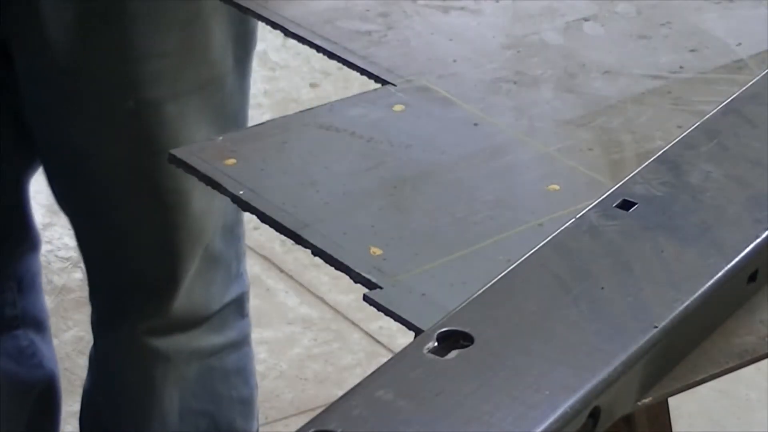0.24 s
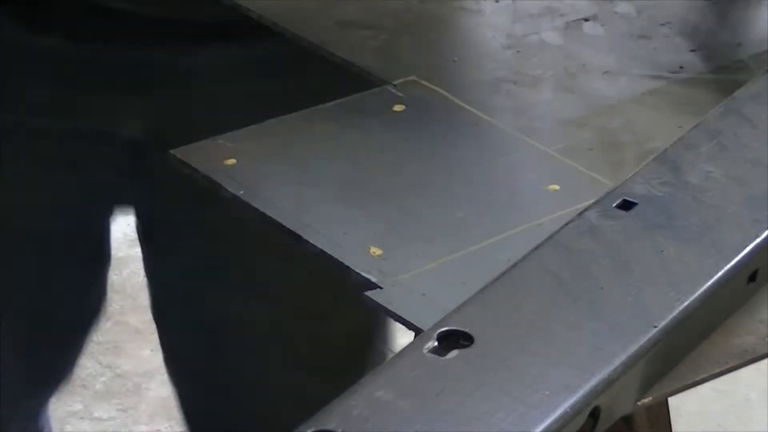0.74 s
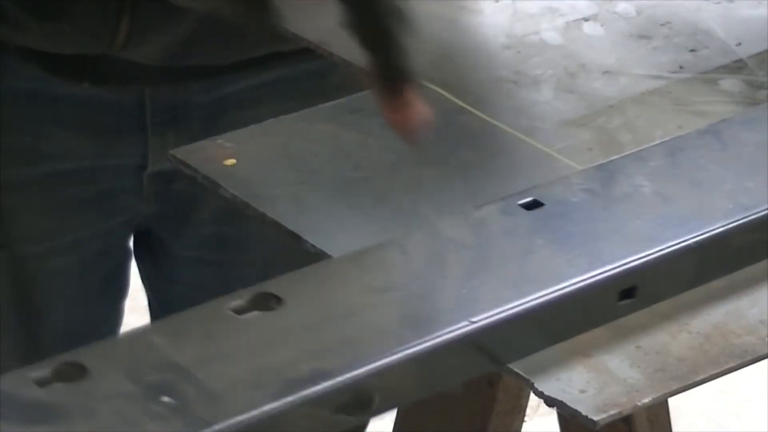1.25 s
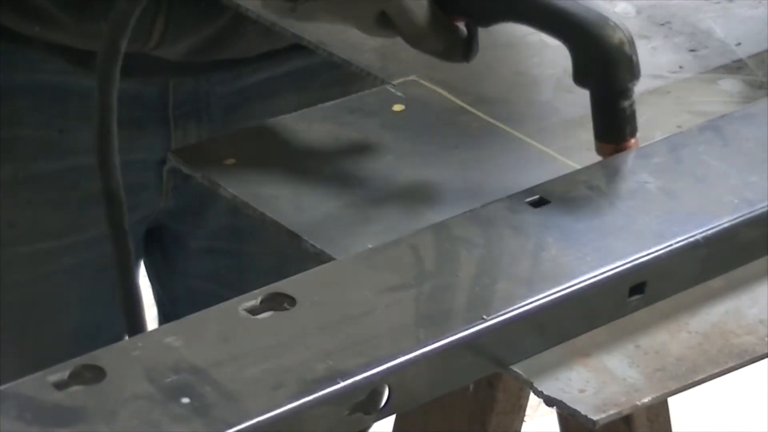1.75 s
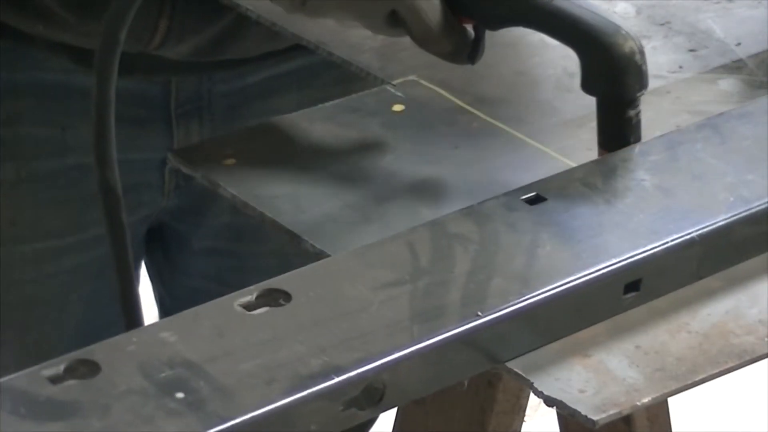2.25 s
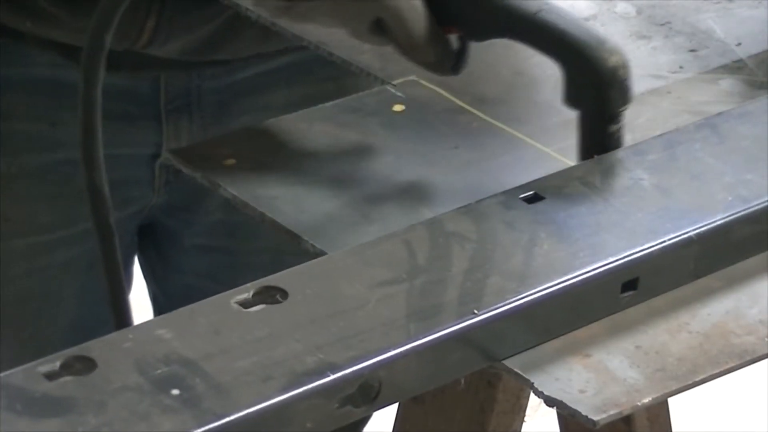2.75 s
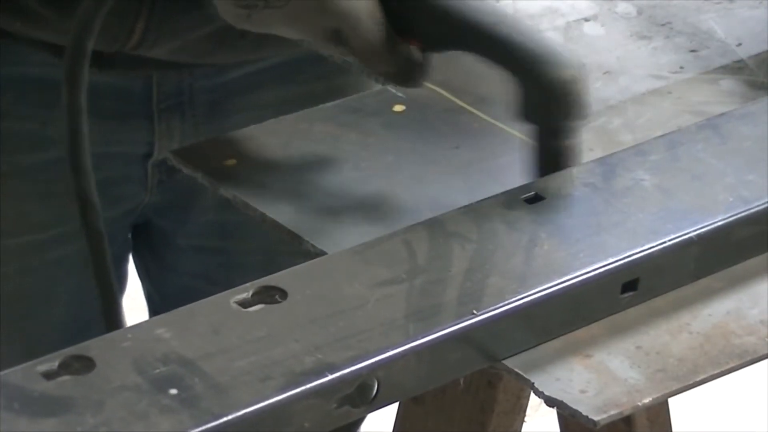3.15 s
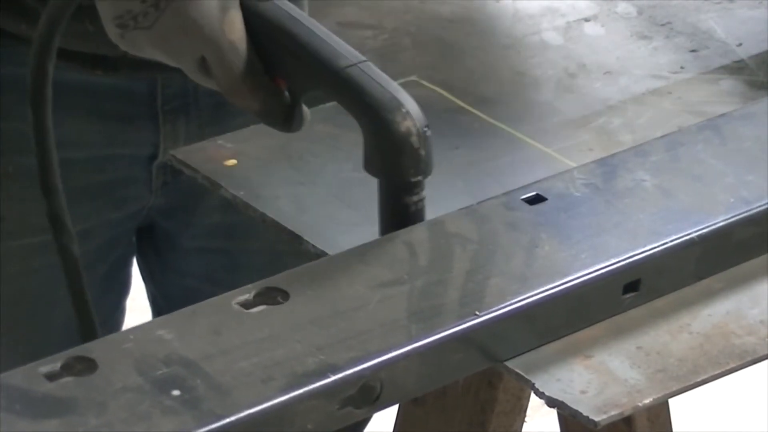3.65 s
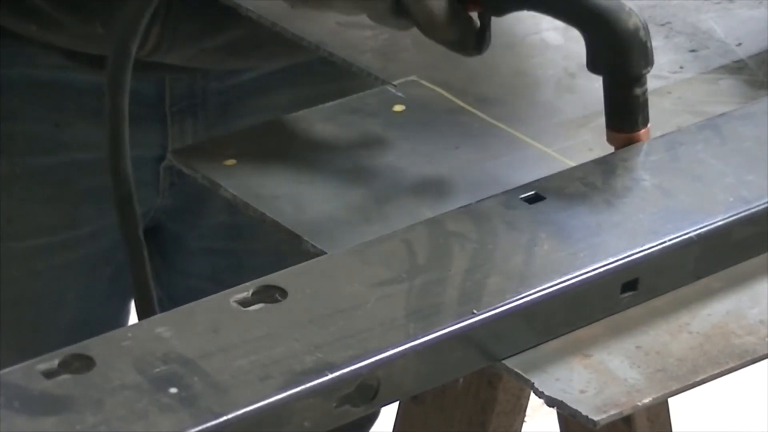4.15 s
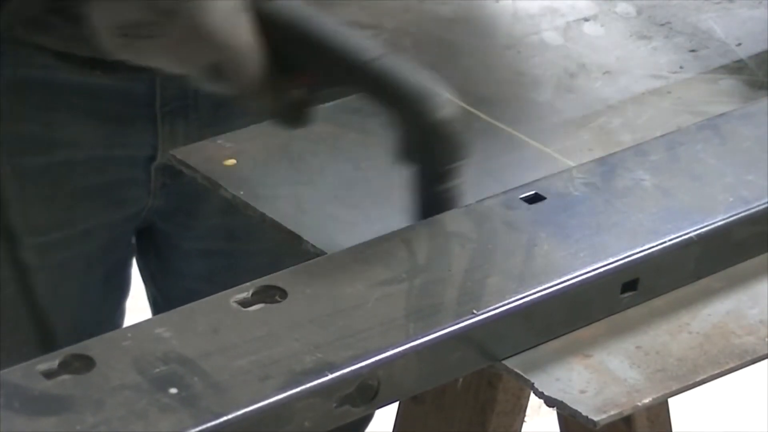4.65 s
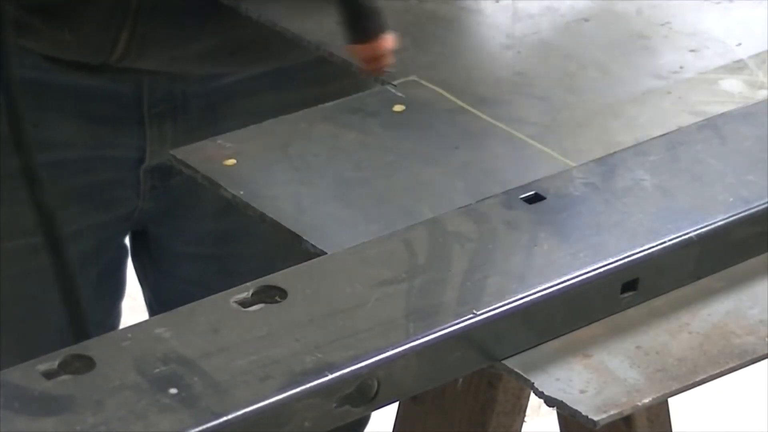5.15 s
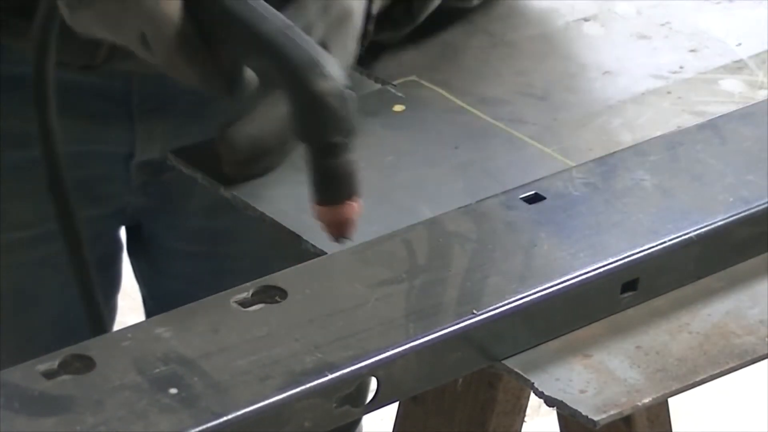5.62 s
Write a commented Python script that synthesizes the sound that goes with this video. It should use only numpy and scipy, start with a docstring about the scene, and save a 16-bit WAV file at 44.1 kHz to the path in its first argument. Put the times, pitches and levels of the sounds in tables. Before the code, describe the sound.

Air hisses loudly from a plasma torch as a steel beam is dragged, then cuts off with a thump before light scraping.

```python
"""Cooling air hisses from a plasma torch over a steel plate in a workshop. A steel channel is dragged into
place, stick-slip driving its modes, and the camera's gain control ducks the clank. As the tip comes down,
the hiss interferes with its reflection from the plate and notches sweep through it. The tip taps the steel
and the jet roars against it. The air valve shuts with a thump, the tip knocks and scrapes along the guide,
and the shop falls quiet but for light taps, low shuffling and the channel's faint ring."""
import sys
import numpy as np
from scipy import signal
from scipy.fft import rfft, irfft, next_fast_len
from scipy.io import wavfile
from scipy.ndimage import uniform_filter1d, minimum_filter1d, map_coordinates

SR = 44100
rng = np.random.default_rng(int(sys.argv[2]) if len(sys.argv) > 2 else 0)


def wav_record(signal):
    """Record a signal, one row per channel, as 16-bit PCM in the file named by sys.argv[1]."""
    frames = np.transpose(np.atleast_2d(signal))
    bounded = np.clip(frames, -1, 1)
    # unit amplitude maps onto the largest positive 16-bit level
    quanta = np.round(bounded * 32767).astype(np.int16)
    wavfile.write(sys.argv[1], SR, quanta)


N = 259308
TIME = np.arange(N) / SR


def amp(db):
    """Amplitude ratio of a level in decibels."""
    return 10 ** (np.asarray(db) / 20)

def unit(x):
    """Normalisation to rms 1."""
    return x / np.sqrt(np.mean(x ** 2) + 1e-20)

def along(points, hz):
    """Interpolation of (frequency, value) points on a logarithmic frequency axis."""
    f, v = np.transpose(points)
    return np.interp(np.log(hz + 1), np.log(f + 1), v)

def curves(rows, t=TIME):
    """Linear interpolation in time of each column after the first."""
    times, *columns = np.transpose(rows)
    return [np.interp(t, times, column) for column in columns]

def during(start_s, end_s):
    """A rectangular window with ramped edges."""
    return uniform_filter1d(1. * ((TIME > start_s) & (TIME < end_s)), size=400)

def filtered(x, response):
    """Linear filtering: the spectrum is multiplied by a frequency response."""
    size = next_fast_len(N + SR)
    return irfft(rfft(x, size) * response(np.fft.rfftfreq(size, 1 / SR)), size)[..., :N]

def noise(spectrum):
    """Spectral shaping of white noise, at rms 1."""
    return unit(filtered(rng.standard_normal(N), lambda hz: amp(along(spectrum, hz))))

def modes(table):
    """Modal superposition: the response of damped resonators of alternating sign."""
    return lambda f: sum((-1) ** k * amp(db) * 1j * f * width / (hz * hz - f * f + 1j * f * width)
                         for k, (hz, width, db) in enumerate(table))

def roughness(rate_hz, depth_db):
    """Random amplitude modulation: a smooth log-normal gain."""
    knots = rng.standard_normal(int(N * rate_hz / SR) + 4)
    return amp(depth_db * map_coordinates(knots, [TIME * rate_hz]))


# Spectra of the shop's air and of shuffling: (frequency [Hz], relative density [dB])
SHOP_SPECTRUM = [(15, -67), (25, -19), (240, -11.5), (540, -17), (1030, -16.5), (1340, -21), (3000, -25.5),
                 (6750, -31), (15600, -40)]
SHUFFLE_SPECTRUM = [(60, -19), (200, -6), (400, 6), (700, -22), (1500, -40.5), (5000, -50.5)]
# Shuffles: (centre time [s], spread [s], level [dB])
SHUFFLES = [(5.18, .04, -63), (5.69, 0.12, -58)]

def background():
    """Ambient noise: steady shop air, and low shuffling under Gaussian envelopes."""
    swells = sum(amp(db) * np.exp(-((TIME - s) / spread) ** 2) for s, spread, db in SHUFFLES)
    return amp(-62) * noise(SHOP_SPECTRUM) + swells * noise(SHUFFLE_SPECTRUM) * roughness(30, 3)


# Decay of the shop: (frequency [Hz], reverberation time T60 [s])
WALL_DECAY = [(100, 0.38), (500, 0.71), (2000, 0.45), (5000, 0.52), (10000, 0.23), (16000, 0.17)]

def reverberation(sources):
    """Diffuse field: two independent tails per source, each frequency decaying at its own rate."""
    hz, t, spectra = signal.stft(rng.standard_normal((2, SR)), SR, nperseg=256)
    tails = signal.istft(spectra * amp(-60 * t / along(WALL_DECAY, hz)[:, None]), SR, nperseg=256)[1]
    tails = np.pad(tails / np.linalg.norm(tails[0]), ((0, 0), (250, 0)))  # delay of the first reflection
    return signal.fftconvolve(sources[None], tails[:, None], axes=2)[..., :N]


# Valve closure and rebound: (peak level [dB], frequency [Hz], spread [s])
VALVE_PULSES = [(-23, 175, .004), (-24, 260, .003)]

def valve(shut_s=4.2255, rebound_s=.01):
    """Impact and rebound: the closing solenoid radiates two low Gaussian pulses."""
    out = 0
    for k, (db, hz, spread) in enumerate(VALVE_PULSES):
        t = TIME - shut_s - k * rebound_s
        out = out + amp(db) * np.exp(-(t / spread) ** 2) * np.cos(2 * np.pi * hz * t)
    return out


# Resonances of the plate: (frequency [Hz], bandwidth [Hz], relative level [dB])
PLATE_MODES = [ (432, 30, -6), (470, 30, -8), (845, 16, -10), (937, 20, -6), (1155, 35, -8), (1365, 25, -3),
               (1520, 25, -7), (1600, 22, -7), (1750, 16, -5), (2130, 35, -6), (2290, 16, 3),
               (2610, 28, -1), (2775, 18, -6), (2890, 20, -6), (3470, 45, -12), (4180, 45, -11),
               (4450, 28, -14), (5670, 35, -13), (5810, 25, -15), (6260, 28, -18), (7190, 22, -14),
               (7470, 28, -19), (7600, 18, -18), (8480, 25, -23)]
# Taps on the steel, the first a bright crack in the channel's clank: (time [s], relative level [dB], centre
# frequency [Hz], decay time T60 [s])
STEEL_TAPS = [(.921, -17, 3000, .07), (1.345, -21, 2098, 0.099), (2.12, -22.5, 440, 0.19),
              (2.14, -39, 104, 0.19), (2.635, -29, 446, 0.22), (2.637, -20, 1360, 0.073),
              (4.33, -15, 743, .08), (4.331, -13, 1410, 0.13), (4.755, -24, 2850, 0.079),
              (4.771, -20.5, 1290, 0.13), (4.796, -38, 2270, 0.16), (4.845, -46, 9000, .04),
              (5.171, -48, 2470, 0.053), (5.215, -41, 1633, 0.037), (5.475, -39, 6500, 0.016),
              (5.584, -46.5, 3010, 0.07), (5.665, -54, 1700, .1), (5.868, -45, 1360, 0.16)]

def taps(rise_s=.0033):
    """Impact excitation: each tap is a band-limited crack that rings the plate modes near its band."""
    out, t = np.zeros(N + SR), np.arange(SR // 2) / SR
    for start, db, centre, t60 in STEEL_TAPS:
        ring = 0
        for hz, _, mode_db in PLATE_MODES:
            strength = amp(mode_db + rng.normal(0, 3) - 30 * np.log2(hz / centre) ** 2)
            ring = ring + strength * np.sin(2 * np.pi * (hz * t + rng.random()))
        band = signal.butter(2, [centre / 1.5, min(centre * 1.5, SR / 2.1)], "band", fs=SR)
        crack = unit(signal.lfilter(*band, rng.standard_normal(len(t))))
        envelope = amp(db - 60 * t / t60) * (1 - np.exp(-t / rise_s))
        out[round(start * SR):][:len(t)] += envelope * (.33 * unit(ring) + .4 * crack)
    return out[:N]


# Friction noise: (frequency [Hz], relative density [dB])
GRIT_SPECTRUM = [(120, -60), (200, -18.5), (461, -5.5), (602, -5.5), (1910, -9), (2280, -9), (3690, -15.5),
                 (7380, -23), (14000, -48)]
# A brief low rasp trailing the knock, then strokes along the guide: (time [s], duration [s], relative level
# [dB], relative treble level [dB])
STROKES = [(4.404, 0.036, -33.5, -19), (4.469, 0.27, -30, -10.5), (4.742, .045, -24, -23)]

def scrape(grip_s=.035, fade_db_per_s=10, upper_fade_db_per_s=18, lift_db_per_s=222):
    """Sliding friction: the tip rubs over mill scale and drives the plate; upper modes fade first."""
    grit = unit(noise(GRIT_SPECTRUM) * roughness(60, 2))
    ring = unit(filtered(rng.standard_normal(N) * roughness(25, 3), modes(PLATE_MODES)))
    contact = grit + .9 * ring
    low = filtered(contact, lambda hz: 1 / (1 + (hz / 2450) ** 16))
    high = filtered(contact - low, lambda hz: 1 / (1 + (4000 / (hz + 1)) ** 4))
    middle = contact - low - high
    out = 0
    for start, length, db, treble_db in STROKES:
        t = np.maximum(TIME - start, 0)
        fall_db = fade_db_per_s * t + lift_db_per_s * np.maximum(t - length, 0)
        envelope = np.minimum(t / grip_s, 1) * amp(db - 5.5 - fall_db)
        upper = amp(-upper_fade_db_per_s * t) * (middle + amp(treble_db + 13) * high)
        out = out + envelope * (low + upper)
    return out


# Resonances of the channel and of its rasp: (frequency [Hz], bandwidth [Hz], relative level [dB])
CHANNEL_MODES = [ (605, 12, 0), (753, 12, 0), (933, 14, -11), (1025, 16, -2), (1170, 20, -9),
                 (1279, 14, -5), (1368, 16, -3), (1561, 12, -5), (1739, 16, -10), (1900, 14, -9),
                 (2105, 20, -7), (2509, 20, -9), (2600, 20, -7), (2775, 16, -7), (3010, 20, -11),
                 (3730, 30, -15)]
RASP_MODES = [(95, 30, -12.5), (450, 180, 1), (1390, 1200, -3), (2600, 730, -.5), (3720, 550, -6)]
# Two shudders and a nudge: (time [s], first mode gain [dB], second mode gain [dB], upper gain [dB])
DRAG_LEVELS = [(0.896, -60, -46.5, -36.5), (.932, -35, -19.5, -14.5), (.968, -23.5, -17.5, -19),
               (1.01, -12.5, -21.5, -17), (1.022, -38, -33.5, -24), (1.036, -14, -21.5, -20),
               (1.075, -26.5, -22.5, -18.5), (1.115, -32.5, -26, -20), (1.13, -58, -43, -30),
               (1.16, -51.5, -55, -28.5), (1.184, -35.5, -55, -37.5), (1.23, -63, -60, -45)]

def channel(ring_start_s=4.99, ring_end_s=5.86, ring_hz=608, ring_t60_s=4.8):
    """Stick-slip excitation: each mode of the channel wavers on its own; the lowest rings faintly later."""
    first_db, second_db, upper_db = curves(DRAG_LEVELS)
    tones = []
    for hz, width, db in CHANNEL_MODES:
        phase_drift = np.log(roughness(3 * width, 7))
        tones.append(amp(db) * np.sqrt(2) * np.sin(2 * np.pi * hz * TIME + phase_drift))
    upper = unit(sum(tone * roughness(30, 1.5) for tone in tones[2:]))
    rasp = unit(filtered(rng.standard_normal(N) * roughness(85, 1.5), modes(RASP_MODES)))
    drag = amp(first_db) * tones[0] + amp(second_db) * tones[1] + amp(upper_db - 3) * (upper + .75 * rasp)
    ring_db = -58.5 - 60 * (TIME - ring_start_s) / ring_t60_s
    ring = amp(ring_db) * np.sqrt(2) * np.sin(2 * np.pi * ring_hz * TIME)
    return during(DRAG_LEVELS[0][0], DRAG_LEVELS[-1][0]) * drag + during(ring_start_s, ring_end_s) * ring


# Air in hose and room: (frequency [Hz], relative density [dB])
RUMBLE_SPECTRUM = [(15, -48), (25, -24.5), (119, -14.5), (204, -15.5), (241, -5.5), (275, -9), (458, 1),
                   (600, -5), (900, -5.5), (1170, -25.5), (1980, -120)]

def rumble():
    """Flow noise: moving air makes a low, unsteady rumble."""
    return amp(-50.5) * noise(RUMBLE_SPECTRUM) * roughness(9, 1.4)


# Air striking steel: (frequency [Hz], relative density [dB])
ROAR_SPECTRUM = [(150, -60), (400, -20), (700, -11), (1050, -8), (1220, 0), (1420, -6), (1900, -7),
                 (2120, -1), (2350, -5), (3000, -5), (4500, -29), (7700, -120)]
# Strength of the roar: (time [s], relative level [dB])
ROAR_LEVELS = [(0, -42.5), (.8, -43.5), (1.5, -36.5), (3.2, -38.5), (3.49, -27), (3.8, -29), (3.91, -26),
               (4.02, -39), (4.22, -36.5), (4.245, -24.5), (4.28, -28.5), (4.4, -53)]

def roar():
    """Jet impingement: turbulence roars where the air meets the steel."""
    return amp(curves(ROAR_LEVELS)[0] - 3) * noise(ROAR_SPECTRUM) * roughness(10, .2)


# Extra travel of the reflected hiss: (time [s], path difference [cm])
REFLECTION_PATH = [(0, 25), (.9, 22), (1.1, 13.7), (1.25, 8.4), (1.35, 5.8), (1.5, 3.7), (1.75, 2.7),
                   (2.3, 2.3), (2.7, 1.7), (3.18, 1.65), (3.25, 3), (3.32, 1.65), (3.76, 1.65), (3.8, 2.6),
                   (3.86, 4), (3.9, 4.7), (3.98, 3.5), (4.2, 2.8)]
# Effects of tip height: (path difference [cm], tilt [dB/octave], whistle gain [dB], splash gain [dB],
# treble side gain [dB])
HEIGHT_EFFECTS = [(1.653, -1.5, 0.5, -1.5, -48.5), (2.3, -1, -5.5, -3, -44), (2.7, 0, -7.5, 2.5, -55.5),
                  (3.2, -1, 0.5, -1.5, -50.5), (4.2, -2.5, 3.5, -10, -61.5), (6, -2, 6.5, -2.5, -51.5),
                  (12, 1.5, 2.5, 3, -26), (25, -2, -5.5, -10.5, -12)]

def tip_height(t):
    """Image-source geometry: the path difference at times t, and the colour and width that go with it."""
    times, cm = np.transpose(REFLECTION_PATH)
    log_path = np.interp(t, times, np.log(cm))
    knots_cm, *effects = np.transpose(HEIGHT_EFFECTS)
    return np.exp(log_path), *(np.interp(log_path, np.log(knots_cm), effect) for effect in effects)


# Turbulence of the jet: (frequency [Hz], relative density [dB])
HISS_SPECTRUM = [(600, -63.5), (1500, -11), (2200, -10), (3190, -3.5), (3800, -5), (4400, -3), (5500, -2.5),
                 (6300, -2.5), (7000, -2), (7550, -2.5), (8100, 0.5), (9700, -1.5), (10500, -3),
                 (14000, -14.5), (15600, -14.5)]
# Strength of the hiss: (time [s], relative level [dB])
HISS_LEVELS = [(0, -22), (.55, -22.5), (.9, -20.5), (1.3, -22), (1.7, -18.5), (1.95, -19.5), (2.5, -19),
               (3.2, -20), (3.6, -19), (3.9, -18.5), (4.25, -20.5)]
# Resonances of the nozzle and of the gap under the tip: (frequency [Hz], bandwidth [Hz], gain [dB])
WHISTLE_MODES = [(8350, 450, -5), (9150, 500, 0), (9750, 500, -2)]
SPLASH_MODES = [(3300, 400, -6), (4600, 400, -2), (5550, 420, 0), (6500, 500, -8), (12500, 1400, -3)]
# Reflection from the plate: (path difference [cm], relative amplitude [0-1])
REFLECTION_SHARE = [(1.65, .25), (2.3, .35), (2.9, .75), (4.5, .6), (6, .8), (12, .7), (17, .15), (25, .1)]

def hiss(stop_s=4.256, bleed_db_per_s=350.5, sound_cm_per_s=34300):
    """Comb filtering: turbulent hiss, coloured by resonances, interferes with its image in the plate."""
    hz, t, spectra = signal.stft(noise(HISS_SPECTRUM), SR, nperseg=256)
    hz = hz[:, None]
    path_cm, tilt, whistle_db, splash_db, _ = tip_height(t)
    emptying_s = np.maximum(t - stop_s, 0)  # the hiss fades and dulls as the line empties
    level_db = curves(HISS_LEVELS, t)[0] - 3 - bleed_db_per_s * emptying_s
    tilt = tilt - np.minimum(336 * emptying_s, 24.5)
    tilt_db = tilt * np.log2(np.maximum(hz, 2000) / 6000)
    excess_roar_db = np.maximum(curves(ROAR_LEVELS, t)[0] + 35.5, 0)
    whistle = amp(whistle_db - .7 * excess_roar_db) * modes(WHISTLE_MODES)(hz)  # yields to a loud roar
    splash = amp(splash_db) * modes(SPLASH_MODES)(hz)
    resonance = np.sqrt(1 + 4 * np.abs(whistle) ** 2 + 4 * np.abs(splash) ** 2)
    share = along(REFLECTION_SHARE, path_cm)
    # The reflection is clearest in the treble; mill scale scatters the very top.
    reflection = share / (1 + (hz / 14000) ** 4 + (5000 / (hz + 1)) ** 2)
    delay = np.exp(-2j * np.pi * hz * path_cm / sound_cm_per_s)
    comb = (1 + reflection * delay) / np.sqrt(1 + share ** 2)
    patches = uniform_filter1d(rng.standard_normal(spectra.shape), size=3, axis=0)
    flicker_db = .92 * unit(uniform_filter1d(patches, size=25, axis=1))
    colour = amp(level_db + tilt_db + flicker_db) * resonance
    return signal.istft(spectra * comb * colour, SR, nperseg=256)[1][:N]


# Stereo width of air and channel, then of steel and shop: (frequency [Hz], side gain [dB])
AIR_WIDTH = [(60, -17.5), (110, -5), (200, -22), (380, -12), (700, -25.5), (1290, -52), (2380, -41.5),
             (4400, -13.5), (8120, -43.5), (15000, -57)]
STEEL_WIDTH = [(60, -9), (110, -8), (200, -8.5), (380, -15.5), (700, -17), (1290, -25), (2380, -17),
               (4400, -7.5), (8120, -22), (15000, -19.5)]

def scene():
    """Superposition: direct and diffuse sound reach two close microphone ports, as mid and side."""
    air = during(0, ROAR_LEVELS[-1][0]) * (hiss() + rumble() + roar())
    steel = scrape() + taps() + valve()
    drag = channel()
    sends = np.array([amp(-9.5) * air + amp(-14.5) * drag, amp(-4.5) * steel])  # the near channel is drier
    diffuse, (air_side, steel_side) = reverberation(sends)
    mid = air + steel + drag + diffuse.sum(0) + background()
    shadow = modes([(8190, 1300, .0067)])  # the camera body shades only the treble
    side = amp(tip_height(TIME)[-1]) * filtered(.4 * air + 2.5 * air_side, shadow)
    side += filtered(air_side, lambda hz: amp(along(AIR_WIDTH, hz) - 3))
    side += filtered(.48 * steel_side + background(), lambda hz: amp(along(STEEL_WIDTH, hz)))
    return np.array([mid + side, mid - side])

def record(dry, threshold_db=-20.5, sense_s=.02, hold_s=.04, ease_s=.008, top_hz=15750):
    """Dynamic range compression: gain control ducks the loudest moments; a band limit cuts the top."""
    sense, hold = round(sense_s * SR), round(hold_s * SR)
    power = uniform_filter1d(np.mean(dry ** 2, 0), size=sense, origin=sense // 2 - 1)
    excess_db = np.maximum(10 * np.log10(np.abs(power) + 1e-12) - threshold_db, 0)
    held_db = minimum_filter1d(-.6 * excess_db, size=2 * hold + 1, origin=hold)  # held for twice hold_s
    gain = amp(uniform_filter1d(held_db, size=round(ease_s * SR)))
    return filtered(dry * gain, lambda hz: hz < top_hz)


dry = scene()
out = record(dry)
wav_record(out)
```